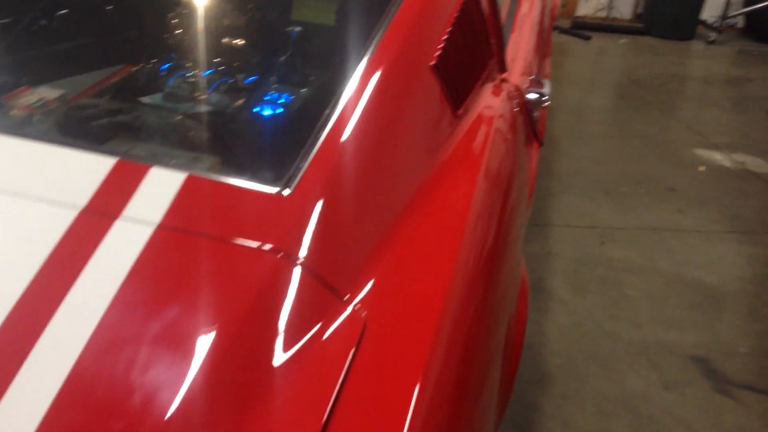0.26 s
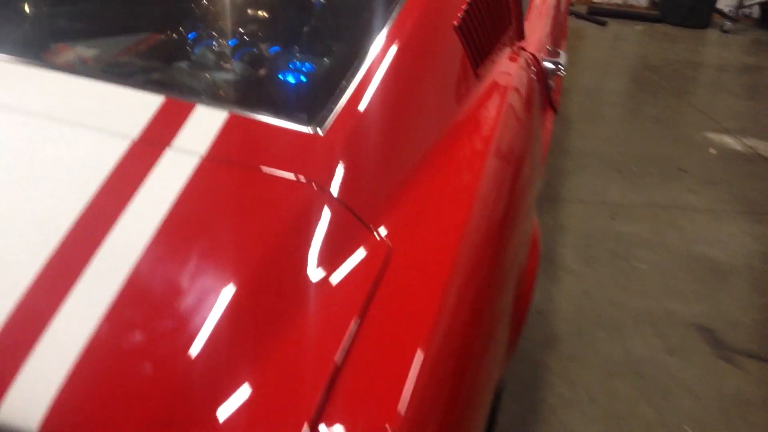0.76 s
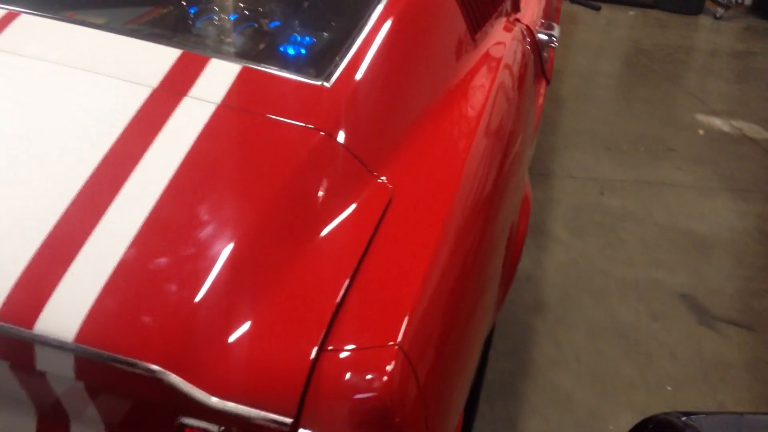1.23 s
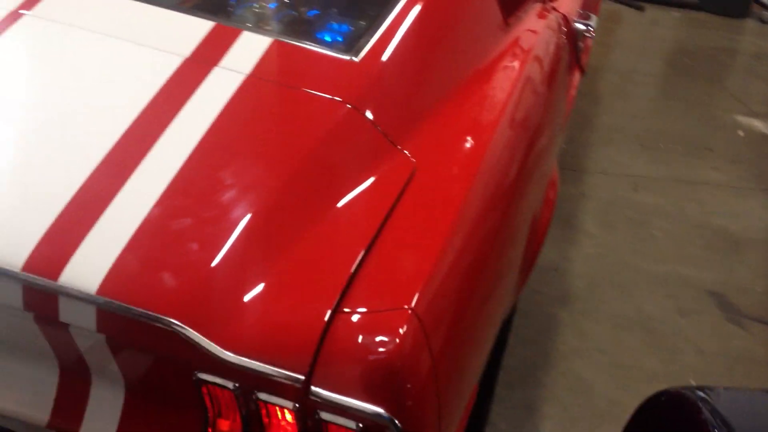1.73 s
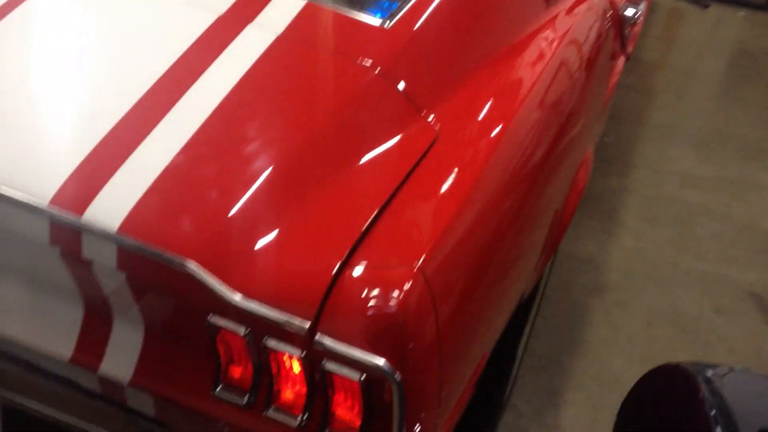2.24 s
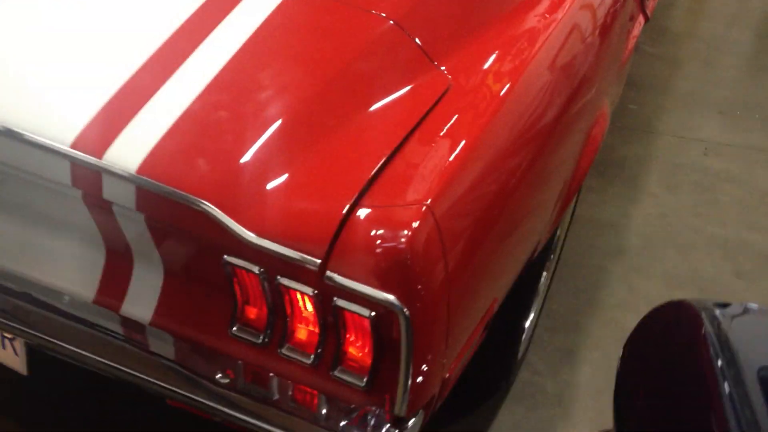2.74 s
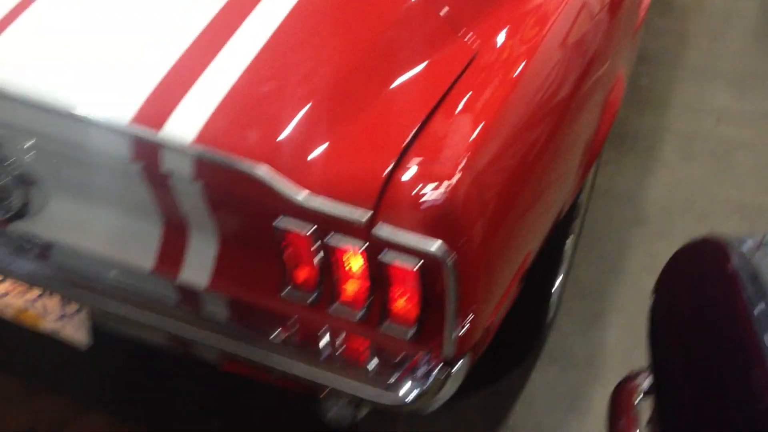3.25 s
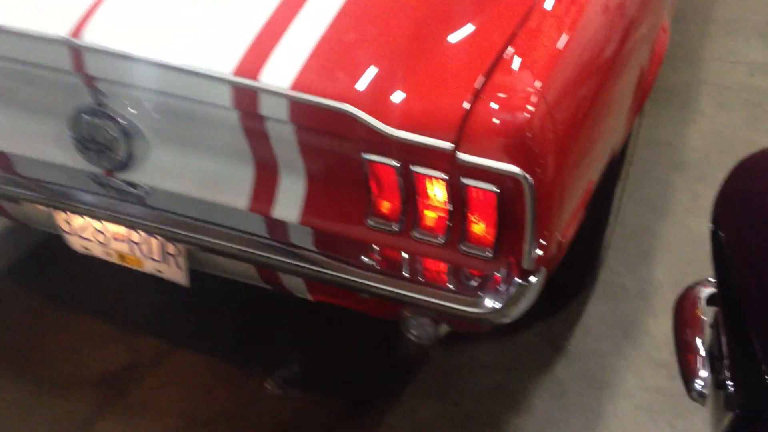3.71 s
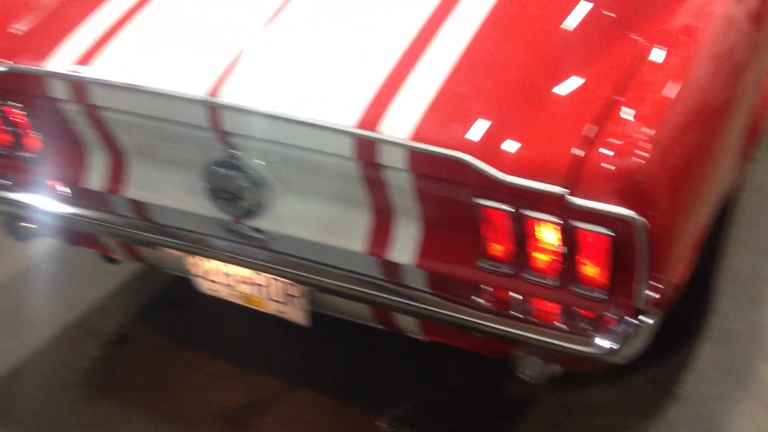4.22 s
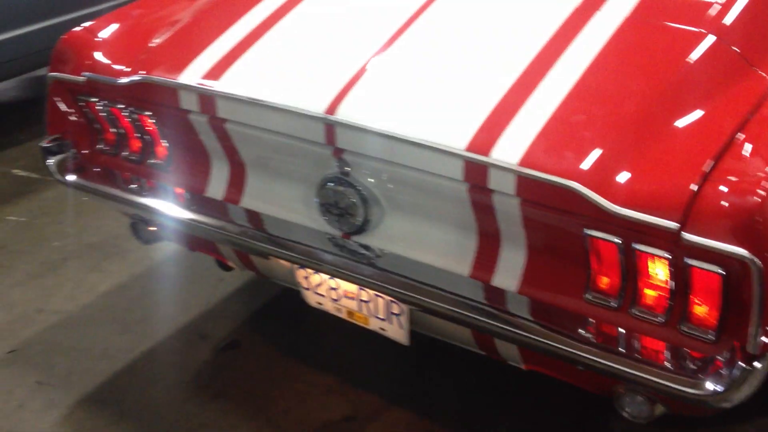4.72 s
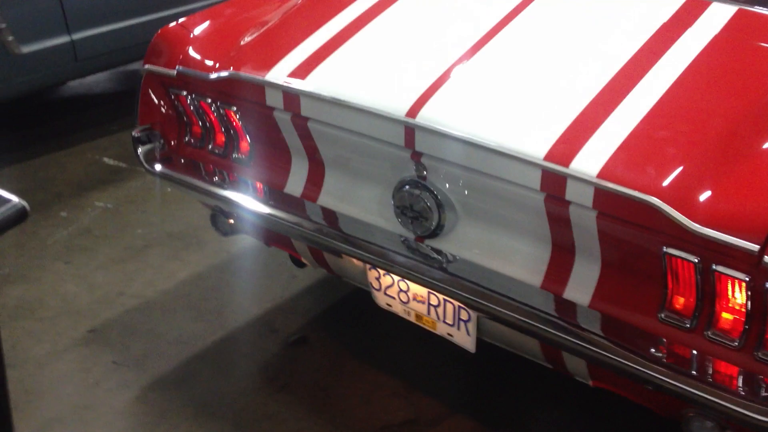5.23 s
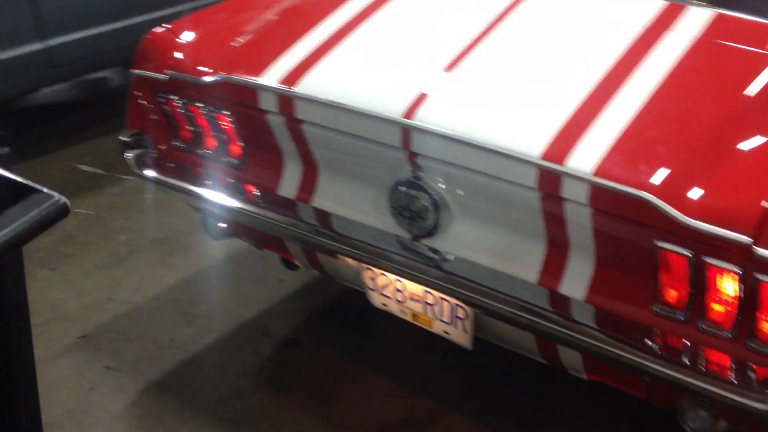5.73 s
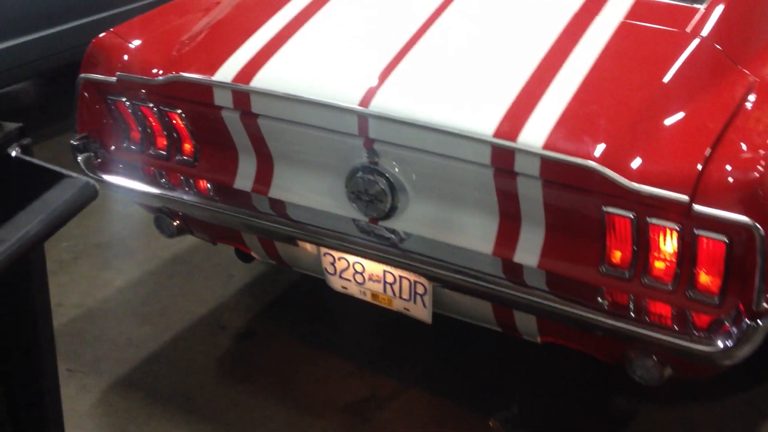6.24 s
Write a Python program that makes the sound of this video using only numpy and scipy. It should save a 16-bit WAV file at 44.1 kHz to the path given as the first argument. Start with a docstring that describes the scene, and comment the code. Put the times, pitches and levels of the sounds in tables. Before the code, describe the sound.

A V8 car engine runs in a workshop, heard from close behind. For the first 3.4 seconds it idles with an uneven, throbbing burble, over a steady rush of fan and valve gear with a faint metallic ring. At about 3.4 seconds the throttle opens with a low thump and a burst of exhaust hiss. The pitch rises to a peak near 3.8 seconds, then falls almost to idle by 4.5, with a few small spits of gas. From about 5 seconds a second rev climbs higher, becoming a loud, smooth drone around 5.6 and topping out near 5.9. The engine then winds down with hiss and light spitting, still dropping when the sound ends at about 6.5 seconds. The deep bass is thin, as through a small microphone, and the loudest beats of both revs carry brief low overload thumps.

```python
"""A V8 idles in a workshop, heard from behind, and is revved twice. Each bank of four cylinders fires
unevenly into its own exhaust pipe and rings it. Gas hisses from the tailpipes under load and spits on
the overrun, over the steady rush of fan and valve gear. The deep bass is thin, as through a small
microphone; the loudest beats carry low thumps of recorder overload, and a limiter holds the peaks."""
import sys
import numpy as np
from scipy import signal
from scipy.io import wavfile
from scipy.ndimage import uniform_filter1d, minimum_filter1d

SR = 44100
rng = np.random.default_rng(int(sys.argv[2]) if len(sys.argv) > 2 else 0)


def bounce(signal):
    """Save signal as a 16-bit WAV file at the path given by the first command-line argument."""
    frames = np.transpose(np.atleast_2d(signal))
    limited = np.clip(frames, -1, 1)
    pcm = np.round(limited * 32767).astype(np.int16)
    wavfile.write(sys.argv[1], SR, pcm)


N = 285327

# four-stroke cycle rate: time_s, cycle_hz
SPEED = [(0.0, 7.35), (0.45, 7.43), (1.0, 7.56), (1.3, 7.545), (1.8, 7.465), (2.1, 7.475), (2.28, 7.41),
         (3.27, 7.61), (3.37, 7.65), (3.47, 10.0), (3.65, 12.6), (3.78, 13.4), (3.9, 12.9), (4.15, 10.8),
         (4.5, 8.8), (4.75, 9.6), (5.0, 9.9), (5.4, 14.0), (5.8, 19.7), (5.87, 20.05), (6.05, 18.8),
         (6.47, 14.3)]
# burn unevenness: time_s, spread_db, common_pulse_ratio, puff_depth_ratio
BURN = [(0, 1., 1, .2), (3.35, 1., 1, .2), (3.39, 2., 1, .75), (3.52, 2., 1, .6), (3.75, 1.3, .8, .2),
        (4.0, 2.5, .4, .2), (5.2, 2.5, .8, .3), (5.4, 1., .15, .3), (5.95, 1., .15, .3),
        (6.47, 2.2, .5, .35)]
# cylinders in firing order: strength_db, header_delay_ms
CYLINDERS = [(-3.5, 3), (0.55, 3), (-2, 4.5), (0.5, 1.62), (0, 2.48), (1.5, 0.5), (-1.56, 1.2), (0.7, 2.33)]
# cross-plane crank, pipe per cylinder: pipe_index (0 near, 1 far)
BANK = [0, 1, 1, 0, 1, 0, 0, 1]
# low pipe modes, minus = inverted: pitch_hz, width_hz, near_gain, far_gain
BOOM_MODES = [(130.3, 27.7, -0.134, 0.14), (151.16, 42.9, 0.4, 0.026), (150.85, 20.4, -0.38, -0.29),
              (192.2, 12.1, -0.19, 0.08), (219.5, 5.9, 0.0065, -0.085), (236.8, 23.5, 0.041, 0.0034)]
# upper pipe modes: pitch_hz, width_hz, near_gain, far_gain
UPPER_MODES = [(289.85, 21.95, 0.928, 0.069), (291, 23.14, -0.9683, -0.047), (329.8, 12.9, 0.0497, -0.029),
               (317.6, 12.3, 0.0017, 0.026), (386, 32, 0.0056, 0.0013), (436, 12, -0.0018, -0.0092),
               (489, 3.7, 0.0046, -0.0036)]
# echoes off cars and walls: delay_ms, gain_db
ECHOES = [(31.4, -20), (52.0, -28.5)]
# exhaust note: time_s, boom_db, upper_db
EXHAUST_LEVELS = [(0.0, -15, -27), (1.3, -14, -23), (3.36, -14, -28.5), (3.41, -8.5, -20),
                  (3.48, -12, -20.5), (3.6, -7.5, -16.5), (3.84, -16, -22), (4.0, -18, -25.5),
                  (4.15, -15.5, -21.5), (4.38, -22, -25), (4.5, -23.5, -34), (4.68, -19.5, -37),
                  (4.87, -12.5, -24), (5.0, -20, -20.5), (5.22, -6.5, -25), (5.32, -9.5, -12),
                  (5.53, -10, -14.5), (5.73, -8.5, -14.5), (5.9, -16.5, -16.5), (6.05, -15, -16.5),
                  (6.4, -11, -20), (6.47, -12, -32)]
# silencer chambers: pitch_hz, width_hz, gain_db
CHAMBERS = [(312.6, 14.4, 3.5), (415, 24.6, -13.5), (478, 43, -18.5)]
# firing-rate tone, lost by the microphone below 100 Hz and as the throttle shuts: time_s, level_db
FIRING_TONE = [(0, -54), (3.7, -52), (4.5, -72), (5.2, -51), (5.32, -23), (5.6, -4), (5.75, -5),
               (5.95, -13.5), (6.03, -29), (6.47, -26)]
# sixth order of the cycle, bared as the throttle shuts: time_s, level_db
SIXTH_TONE = [(0, -60), (5.8, -64), (5.9, -28), (6.0, -16), (6.12, -20), (6.22, -33), (6.47, -60)]
# engine bay rush, with a brief dull burst of recorder overload in the second rev:
# time_s, dull_db, bright_db, ringing_db
BAY_LEVELS = [(0.0, -34, -35, -35.5), (1.2, -34, -34, -35.5), (2.4, -36.5, -33.5, -36.5),
              (3.7, -36.5, -34, -35), (4.16, -37, -32, -32), (4.58, -40, -35.5, -38.5),
              (5.19, -36, -29, -32.5), (5.4, -36, -34.5, -35.5), (5.49, -32.5, -33.5, -33),
              (5.54, -25.5, -37, -34), (5.6, -34, -33.5, -36), (5.7, -34.5, -36.5, -38),
              (6.47, -34.5, -30.5, -29.5)]
# bay rush spectrum: freq_hz, density_db
RUSH_SPECTRUM = [(210, -20), (350, 0), (423, -17.5), (478, -9), (636, -9), (719, -9), (1100, -7.5),
                 (1220, -5.5), (1990, -5), (2540, -7), (3120, -4), (3930, -15.5), (9000, -28), (11700, -79),
                 (19800, -120)]
# panel resonances, gain re the rush: pitch_hz, width_hz, gain_db
PANEL_MODES = [(712, 24, -0.5), (958, 11, -3.5), (1094, 57, -3), (1349, 35, 0.5), (1472, 130, -9),
               (2008, 210, -4), (4595, 460, 1.5)]
# metal part singing in the rush: pitch_hz, width_hz, gain_db
METAL_MODES = [(2952, 120, -3.5), (3067, 62, 3), (3140, 56, 4), (3213, 66, -1.5)]
# tailpipe jet spectrum: freq_hz, density_db
HISS_SPECTRUM = [(2650, -28), (4500, 8), (4690, -5), (5230, -13), (6600, -1.5), (9830, -8), (10700, -12.5),
                 (12100, -5.5), (14600, -7), (15500, -10)]
# tailpipe jet strength: time_s, level_db
HISS_LEVEL = [(0.0, -54.5), (0.4, -49.5), (0.9, -52), (3.24, -50.5), (3.33, -47.5), (3.48, -33.5),
              (3.67, -39), (4.08, -39.5), (4.36, -49.5), (4.65, -52), (5.08, -42), (5.21, -36.5),
              (5.41, -37), (5.58, -33.5), (5.84, -40), (6.09, -30), (6.29, -32.5), (6.47, -37)]
# jet treble shelf above 9.5 kHz: time_s, gain_db
HISS_SHELF = [(0, 2), (3.2, -0.5), (3.4, 5.5), (3.7, -1.5), (4.5, -3.5), (6.47, -3)]
# single spits of gas: start_s, level_db
SPITS = [(1.5544, -45), (1.712, -43), (1.9834, -50), (3.371, -35), (3.4002, -42), (3.4406, -39),
         (3.4774, -50), (3.4996, -43), (4.0163, -44), (4.1046, -40), (4.135, -35), (4.2263, -33),
         (4.3201, -38), (5.675, -51), (6.0594, -38), (6.0894, -41), (6.2344, -34), (6.3044, -36)]
# low thumps of recorder overload on the loudest beats: time_s, peak_db
THUMPS = [(3.400, -22), (3.531, -40), (3.645, -31), (5.228, -31), (5.350, -39), (5.600, -38), (5.649, -41)]


def from_db(db):
    """Level to gain."""
    return 10 ** (np.asarray(db) / 20)


def unit_rms(x):
    """Scale to rms 1."""
    return x / np.sqrt(np.mean(x ** 2) + 1e-20)


def evened(x, window_s):
    """Hold the running rms at 1."""
    return x / np.sqrt(uniform_filter1d(x ** 2, int(window_s * SR)) + 1e-12)


def curves(table):
    """Columns of a time table, one value per sample."""
    time_s, *columns = np.transpose(table)
    return [np.interp(np.arange(N) / SR, time_s, column) for column in columns]


def drift(corner_hz):
    """Slow random wander, rms 1."""
    hop = 40
    r = np.exp(-2 * np.pi * corner_hz * hop / SR)
    slow = signal.lfilter([1], [1, -2 * r, r * r], rng.standard_normal(N // hop + 2002))[2000:]
    return np.interp(np.arange(N) / hop, np.arange(len(slow)), unit_rms(slow))


def resonance(x, hz, width_hz):
    """Two-pole peak, gain 1."""
    r = np.exp(-np.pi * width_hz / SR)
    poles = [1, -2 * r * np.cos(2 * np.pi * hz / SR), r * r]
    return signal.lfilter(np.array([1, 0, -1]) * (1 - r * r) / 2, poles, x)


def double_resonance(x, hz, width_hz):
    """Two equal peaks in series."""
    return resonance(resonance(x, hz, width_hz), hz, width_hz)


def butter(x, hz, kind, order):
    """Butterworth filter."""
    return signal.sosfilt(signal.butter(order, hz, kind, fs=SR, output="sos"), x)


def band_noise(spectrum, flicker_db):
    """Third-octave noise bands, each flickering about its level; rms 1."""
    freq_hz, density_db = np.transpose(spectrum)
    octaves = np.log2(min(freq_hz[-1], 19000) / freq_hz[0])
    edges_hz = freq_hz[0] * 2 ** np.arange(0, octaves + .3, 1 / 3)
    shared = 0.27 * drift(1.04)
    white = rng.standard_normal((2, N))
    noise = np.zeros(N)
    for k, (low_hz, high_hz) in enumerate(zip(edges_hz, edges_hz[1:])):
        level_db = np.interp(np.log(low_hz * high_hz) / 2, np.log(freq_hz), density_db)
        band = butter(white[k % 2], [low_hz, high_hz], "band", order=2)
        noise += from_db(level_db + flicker_db * (shared + drift(10.3))) * band
    return unit_rms(noise)


def firings(cycles, far_path_ms=9.22):
    """One pulse per firing, uneven in strength and timing; rows: near pipe, far pipe."""
    count = np.arange(int(8 * cycles[0]) + 1, int(8 * cycles[-1]))
    due = np.interp(count / 8, cycles, np.arange(N))
    strength_db, header_ms = np.array(CYLINDERS)[count % 8].T
    pipe = np.array(BANK)[count % 8]
    spread_db, common, _ = (curve[due.astype(int)] for curve in curves(BURN))
    strength_draw, timing_draw = rng.standard_normal((2000, 2))[:len(count)].T
    jitter_ms = .105 * spread_db ** 1.4 * timing_draw
    arrival = due + (header_ms + pipe * far_path_ms + jitter_ms) * SR / 1000
    strength = from_db(strength_db + spread_db * strength_draw)
    # the common pulse merges into the firing tone at speed and fades on the overrun
    strength -= (1 - common) * np.mean(from_db(strength_db))
    pulses = np.zeros((2, N))
    np.add.at(pulses, (pipe, np.clip(arrival, 0, N - 1).astype(int)), strength)
    return pulses


def pipes(pulses, modes):
    """Both pipes ring at the same pitches, each with its own gains; nearby surfaces echo."""
    direct = sum(resonance(np.array([near, far]) @ pulses + 1e-18, hz, width_hz)
                 for hz, width_hz, near, far in modes)
    sound = direct.copy()
    for delay_ms, gain_db in ECHOES:
        lag = int(delay_ms * SR / 1000)
        sound[lag:] += from_db(gain_db) * direct[:-lag]
    return sound


def silencer(pulses, cycle_hz, idle_hz=7.5, full_hz=9.5, idle_db=-11.5, rise_db=6.5):
    """Pulses and turbulent gas ring narrow chambers, louder off idle."""
    off_idle = np.clip((cycle_hz - idle_hz) / (full_hz - idle_hz), 0, 1)
    drive = unit_rms(pulses) + 0.52 * off_idle * rng.standard_normal(N)
    rings = sum(from_db(db) * evened(double_resonance(drive, hz, width_hz), window_s=.11)
                for hz, width_hz, db in CHAMBERS)
    return from_db(idle_db + rise_db * off_idle) * rings


def order_tone(cycles, levels, order):
    """Clean tone at a multiple of the cycle rate."""
    level_db, = curves(levels)
    return from_db(level_db) * np.sin(2 * np.pi * order * cycles)


def room_rumble():
    """Low room noise, rms 1."""
    return unit_rms(butter(rng.standard_normal(N), [22, 300], "band", order=1))


def engine_bay():
    """Fan, belts and valve gear blur into a rush; panels and a metal part ring in it."""
    dull_db, bright_db, ringing_db = curves(BAY_LEVELS)
    rush = band_noise(RUSH_SPECTRUM, flicker_db=0.93)
    rush += sum(from_db(db) * double_resonance(rush, hz, width_hz) for hz, width_hz, db in PANEL_MODES)
    dull = unit_rms(butter(rush, 770, "low", order=2))
    bright = unit_rms(butter(rush, 1640, "high", order=2))
    white = rng.standard_normal(N)
    ringing = sum(from_db(db + 0.86 * drift(2.0)) * double_resonance(white, hz, width_hz)
                  for hz, width_hz, db in METAL_MODES)
    return from_db(dull_db) * dull - from_db(bright_db) * bright + from_db(ringing_db) * unit_rms(ringing)


def tailpipe_hiss(cycles, puff_spread_db=2.5, decay_per_firing=1.2):
    """Jet noise that puffs with every firing and swells with each spit."""
    level_db, = curves(HISS_LEVEL)
    shelf_db, = curves(HISS_SHELF)
    _, _, depth = curves(BURN)
    firing = 8 * cycles + 0.33
    sizes = from_db(puff_spread_db * rng.standard_normal(2000))[firing.astype(int)]
    puffs = uniform_filter1d(sizes * np.exp(-decay_per_firing * (firing % 1)), 60)
    flow = 1 - depth + depth * evened(puffs, window_s=.1)
    gain = from_db(level_db) * evened(flow, window_s=.1) + spit_envelope()
    jet = band_noise(HISS_SPECTRUM, flicker_db=1.53)
    jet += (from_db(shelf_db) - 1) * butter(jet, 9500, "high", order=1)
    return gain * (jet + 0.43 * resonance(jet, 6540, 670) + 0.34 * resonance(jet, 11140, 710))


def spit_envelope(attack_s=0.0015, t60_s=0.049):
    """Bursts of gas: the jet gain jumps and dies away."""
    gain = np.zeros(N)
    for start_s, level_db in SPITS:
        start = int(start_s * SR)
        age_s = np.arange(N - start) / SR
        gain[start:] += from_db(level_db - 60 * age_s / t60_s) * np.minimum(age_s / attack_s, 1)
    return gain


def overload_thumps(sigma_s=0.0025, ring_hz=154, width_hz=21.5, ring_re_thump_db=21.52):
    """Low thumps of recorder overload at set times, each with a booming ring of the near pipe."""
    time_s = np.arange(N) / SR
    rise_samples = SR / (np.pi * width_hz)
    unit_peak_kick = np.e * rise_samples / 2
    lead = int(rise_samples / 2)   # the ring starts just ahead of the thump
    kicks, thumps = np.full(N, 1e-18), np.zeros(N)
    for at_s, peak_db in THUMPS:
        kicks[int(at_s * SR) - lead] = from_db(peak_db + ring_re_thump_db) * unit_peak_kick
        thumps += from_db(peak_db) * np.exp(-((time_s - at_s) / sigma_s) ** 2 / 2)
    return thumps + double_resonance(kicks, ring_hz, width_hz)


def scene(start_cycles=.58, rumble_re_boom_db=-40):
    """Exhaust note, room rumble, engine bay, hiss and overload thumps; mono."""
    cycle_hz, = curves(SPEED)
    cycles = start_cycles + np.cumsum(cycle_hz) / SR
    pulses = firings(cycles)
    boom = evened(butter(pipes(pulses, BOOM_MODES), [105, 300], "band", order=4), window_s=.134)
    upper = evened(butter(pipes(pulses, UPPER_MODES), [250, 560], "band", order=3), window_s=.27)
    rumble = from_db(rumble_re_boom_db) * room_rumble()
    chambers = silencer(pulses[0], cycle_hz)
    boom_db, upper_db = curves(EXHAUST_LEVELS)
    exhaust = from_db(boom_db) * (boom + rumble) + from_db(upper_db) * (upper + chambers)
    tones = order_tone(cycles, FIRING_TONE, order=8) + order_tone(cycles, SIXTH_TONE, order=6)
    hiss = tailpipe_hiss(cycles)
    return (exhaust + tones + engine_bay() + hiss + overload_thumps())[None]


def record(dry, window_s=0.0064, stopband_hz=15700):
    """Fast look-ahead limiter at full scale, then a steep treble cut."""
    needed_db = np.minimum(-20 * np.log10(np.abs(dry) + 1e-9), 0)
    window = int(window_s * SR)
    gain_db = uniform_filter1d(minimum_filter1d(needed_db, window), window)
    lowpass = signal.cheby2(20, 60, stopband_hz, fs=SR, output="sos")
    return signal.sosfilt(lowpass, from_db(gain_db) * dry)


dry = scene()
out = record(dry)
bounce(out)
```